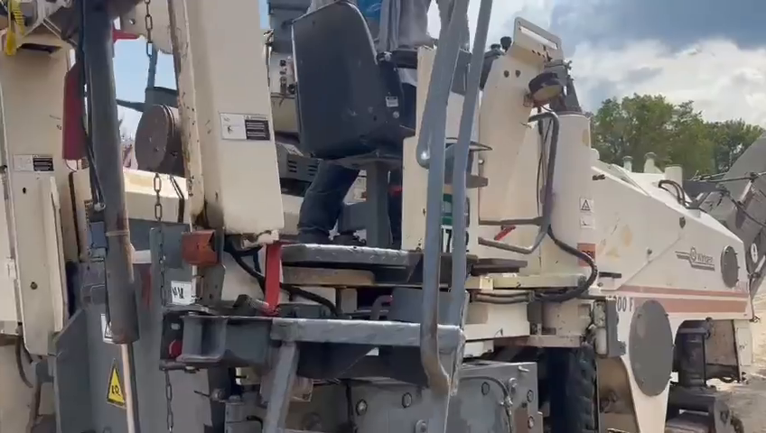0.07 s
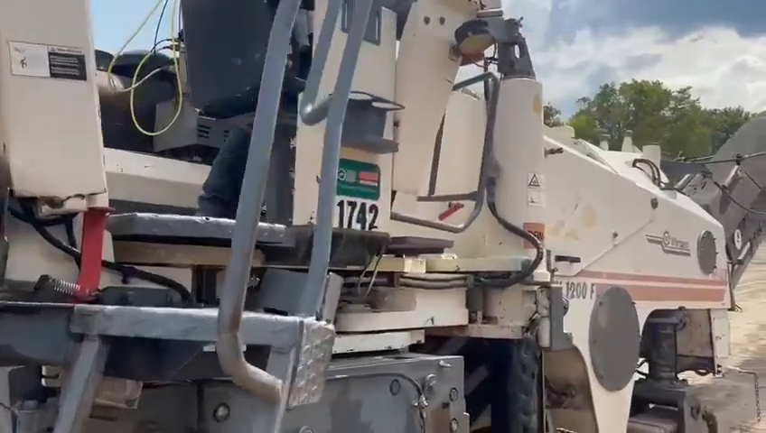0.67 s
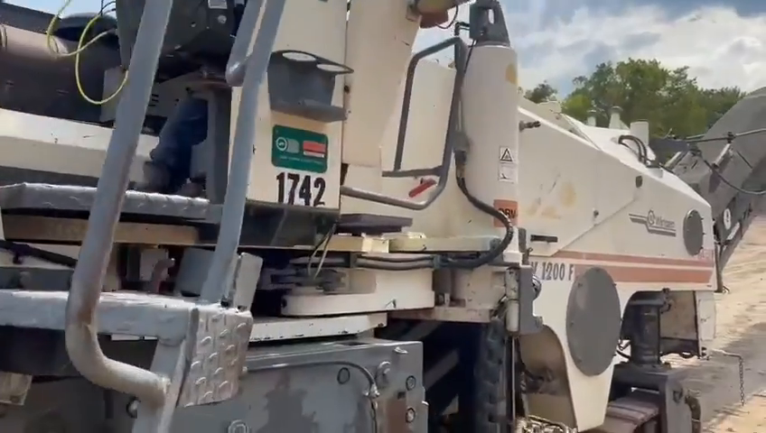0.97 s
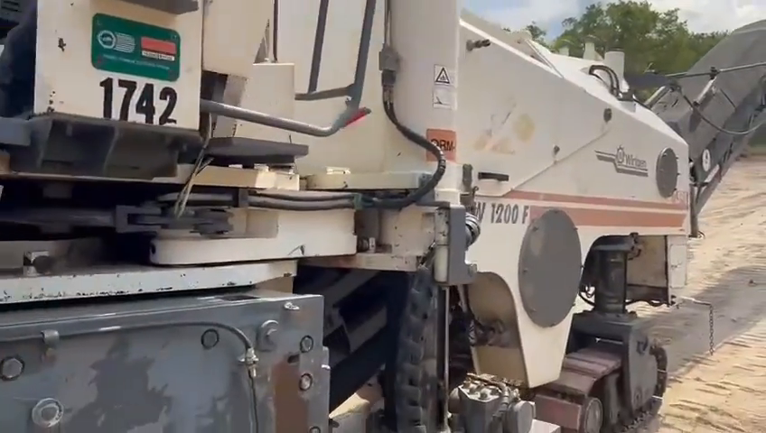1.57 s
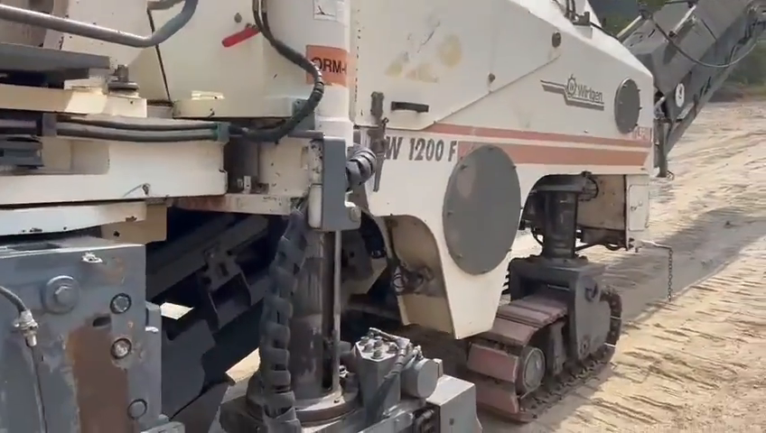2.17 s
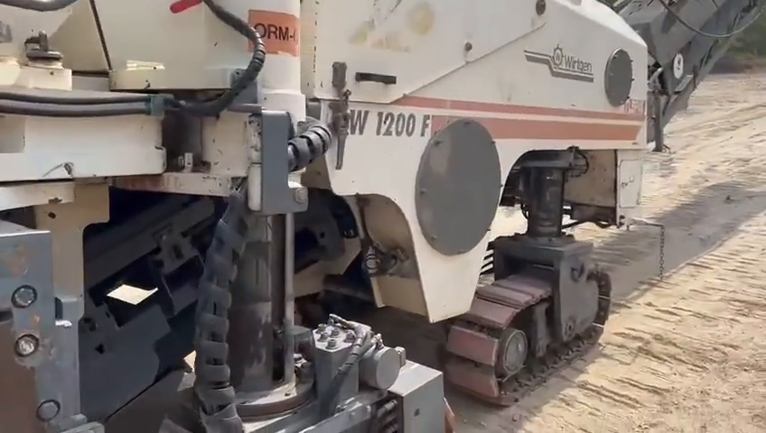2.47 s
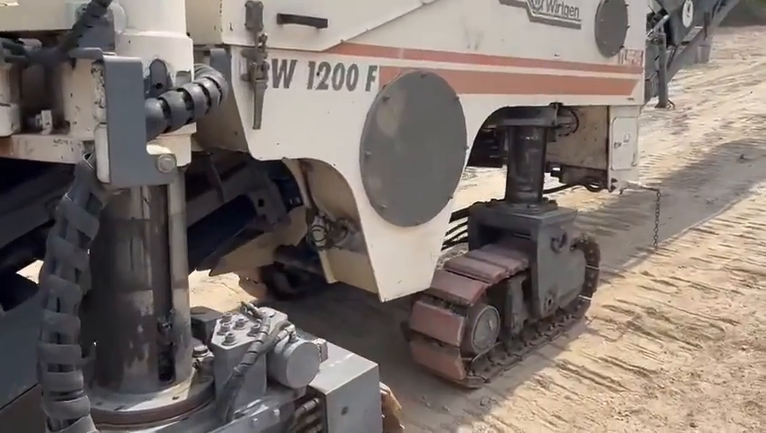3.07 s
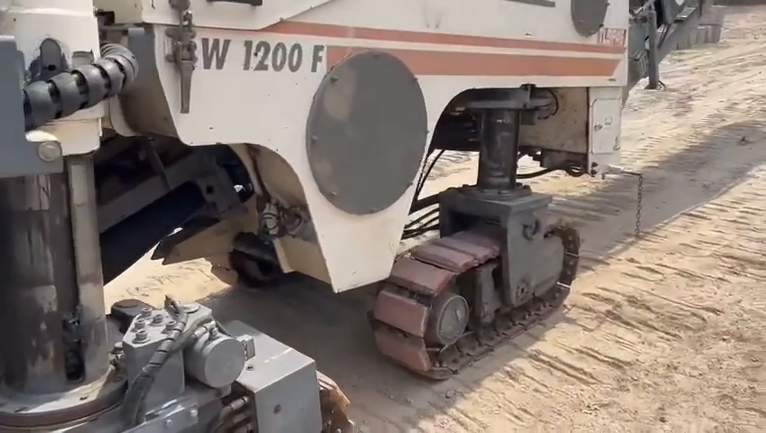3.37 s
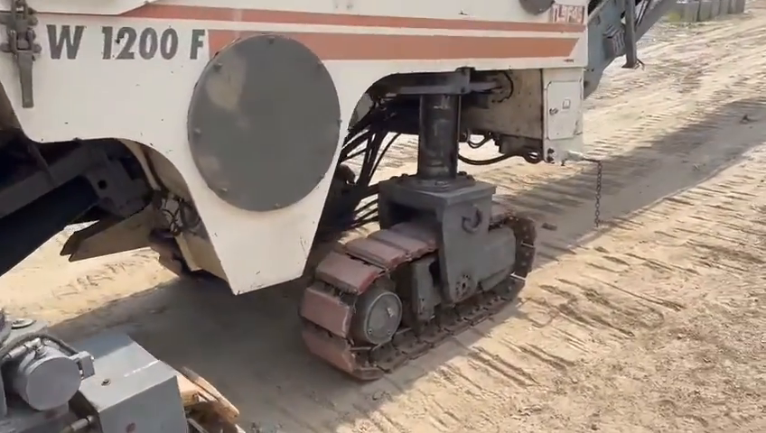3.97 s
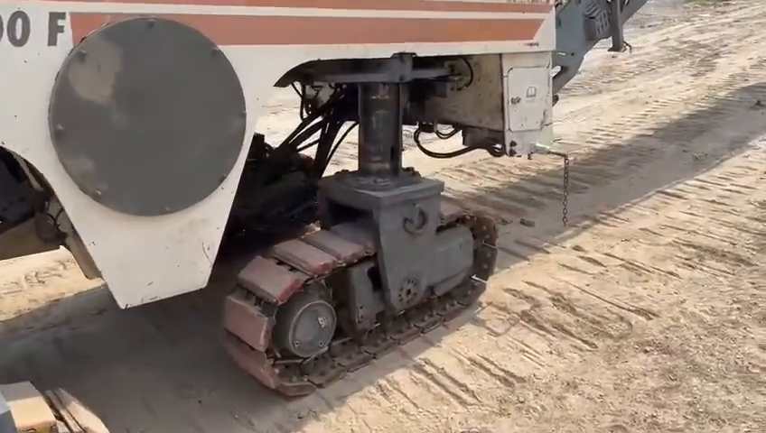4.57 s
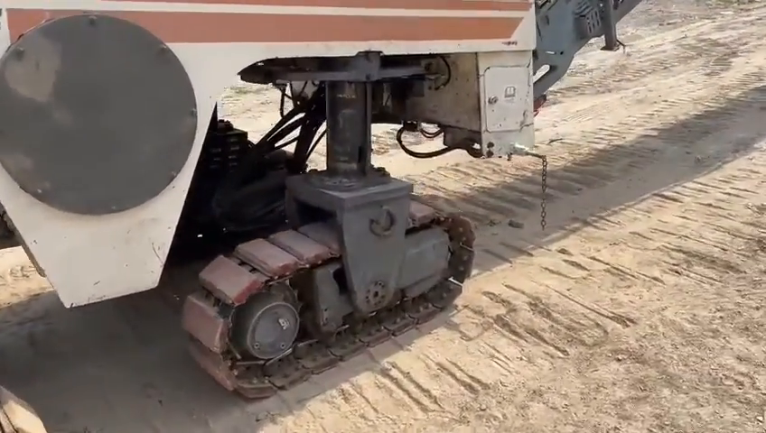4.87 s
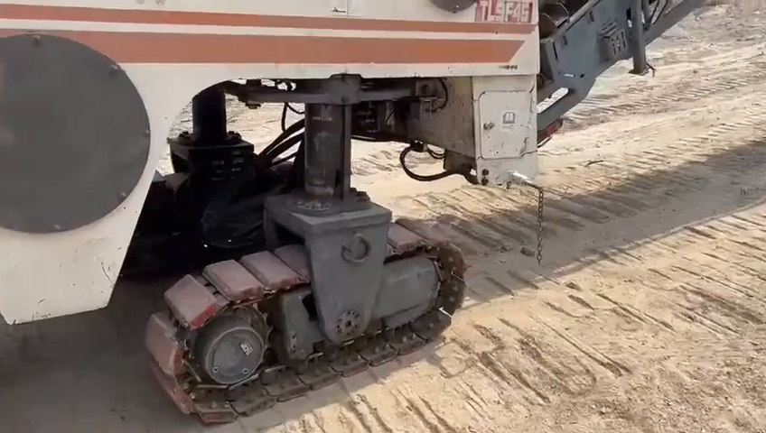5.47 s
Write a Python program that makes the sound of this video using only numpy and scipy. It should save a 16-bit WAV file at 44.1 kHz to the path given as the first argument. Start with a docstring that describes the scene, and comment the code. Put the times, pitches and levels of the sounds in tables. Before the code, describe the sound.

The large diesel engine of a parked road milling machine runs at a constant high speed throughout, heard close up outdoors as the microphone moves along its side. A deep exhaust drone and rumble sit under dense mechanical rattle, faintly ringing metal covers, rushing cooling air and a thin hiss. A mid-pitched fan hum pulses quickly, clearest from about 0.5 to 1.7 seconds. The combustion clatter grows brighter between 0.5 and 3 seconds. A thin pump whine swells and fades, standing out near 2 seconds and again around 3.5 to 4 seconds. The drone is fullest at about 3 seconds, then recedes from 4 seconds on, while the rumble and clatter carry on. From about 4 to 5 seconds the fan hum flutters in brief, rough surges. The sound drifts slightly to the left and is still running at the end, near 5.6 seconds.

```python
"""Walking past a parked road milling machine

Its six-cylinder diesel runs at a governed 2450 rpm on open sand. The exhaust drones at the firing rate,
combustion rattles the block and rings the covers, the fan hums and rushes, and a pump drive whines.
The microphone walks along the side, through the tones' standing waves and out of the exhaust's reach."""
import sys
import numpy as np
from scipy import signal
from scipy.fft import rfft, irfft, next_fast_len
from scipy.io import wavfile
from scipy.ndimage import uniform_filter1d, map_coordinates

SR = 44100
rng = np.random.default_rng(int(sys.argv[2]) if len(sys.argv) > 2 else 0)


def store_pcm(level_fs):
    """Save levels as 16-bit WAV."""
    pcm = np.round(np.clip(level_fs, -1, 1) * 32767).astype(np.int16)
    wavfile.write(sys.argv[1], SR, np.atleast_2d(pcm).T)


N = 252252
TIME = np.arange(N) / SR
CYCLE_HZ = 20.41  # one engine cycle: two crank turns, six firings


def amp(db):
    """Decibels to gain."""
    return 10 ** (np.asarray(db) / 20)


def unit(x):
    """Scale to rms 1."""
    return x / np.sqrt(np.mean(x ** 2) + 1e-20)


def along(points, hz):
    """Read (frequency, value) points on a log axis."""
    freqs, values = np.transpose(points)
    return np.interp(np.log(hz + 1), np.log(freqs), values)


def curves(rows):
    """One automation curve for each column after the time."""
    times, *columns = np.transpose(rows)
    return [np.interp(TIME, times, column) for column in columns]


def ramp(start_s, length_s):
    """An even rise from 0 to 1."""
    return np.clip((TIME - start_s) / length_s, 0, 1)


def bell(at_s, half_s):
    """A smooth swell to 1 and back."""
    return np.exp(-((TIME - at_s) / half_s) ** 2)


def standing(loudest_s, spacing_s, swing_db):
    """A tone's rise and fall in dB as the microphone walks through its standing wave."""
    return swing_db * np.cos(2 * np.pi * (TIME - loudest_s) / spacing_s)


def drift(rate):
    """A smooth random curve on a coarse time grid, rate knots a second."""
    count = N // 64
    return map_coordinates(rng.standard_normal(count), [np.linspace(0, N, count) * rate / SR], mode="wrap")


def stretched(coarse):
    """A coarse curve at one value per sample."""
    return np.interp(np.arange(N), np.linspace(0, N, len(coarse)), coarse)


def wobble(rate):
    """Smooth random modulation, rate knots a second."""
    return stretched(drift(rate))


def noise():
    """Two unrelated white noises."""
    return rng.standard_normal((2, N))


def filtered(x, response):
    """Equalise x with a gain that is a function of frequency."""
    size = next_fast_len(N + SR // 4)
    return irfft(rfft(x, size) * response(np.fft.rfftfreq(size, 1 / SR)), size)[..., :N]


# Stereo balance: (frequency [Hz], left minus right [dB])
STEREO_BALANCE = [(60, 1), (200, 2), (500, 2.5), (2000, 2.5), (4000, 2.5), (5400, 8), (7000, -0.5),
                  (9000, 4.5)]
# Stereo phase; the top hiss is in nearly opposite phase: (frequency [Hz], left lead [rad])
STEREO_PHASE = [(60, .06), (200, .28), (500, .5), (1200, 1.05), (2000, .45), (3000, 1.0), (3800, .3),
                (4800, .55), (6500, 0), (8100, -.1), (9100, -3), (11500, -2.8)]
def stereo_gains(hz):
    """Complex gain of the left and right channel: the image leans left."""
    half = amp(along(STEREO_BALANCE, hz) / 2) * np.exp(.5j * along(STEREO_PHASE, hz))
    return np.array([half, 1 / half])


# Stereo likeness; the top hiss is nearly identical left and right: (frequency [Hz], likeness [0-1])
STEREO_LIKENESS = [(100, .99), (250, .92), (500, .76), (1000, .45), (2000, .5), (4000, .46), (7800, .5),
                   (9200, .98)]
def spread(pair, spectrum):
    """Two unrelated signals become one coloured stereo sound of rms 1."""
    def mid_side_gains(hz):
        width = np.arccos(np.clip(along(STEREO_LIKENESS, hz), 0, 1)) / 2
        return amp(along(spectrum, hz)) * np.array([np.cos(width), np.sin(width)])
    mid, side = filtered(pair, mid_side_gains)
    return unit(filtered(np.array([mid + side, mid - side]), stereo_gains))


def tone(clock, hz, scatter, rate):
    """A stereo tone of rms 1: a direct wave plus shifting reflections, scatter times as strong."""
    common, left, right = [(drift(rate) + 1j * drift(rate)) / np.sqrt(2) for _ in range(3)]
    alike = np.clip(along(STEREO_LIKENESS, hz), 0, 1)
    reflected = np.sqrt(alike) * common + np.sqrt(1 - alike) * np.array([left, right])
    gains = stereo_gains(hz)[:, None] * (1 + scatter * reflected)
    wave = np.exp(2j * np.pi * hz * clock)
    return unit(np.array([np.real(stretched(gain) * wave) for gain in gains]))


# Sub-bass bed: (frequency [Hz], relative level [dB])
SUB_SPECTRUM = [(10, -16.5), (25, -13), (40, -9), (60, 3), (80, -6), (130, -31), (300, -80)]
def sub_bass():
    """The longest waves bend round the machine and stay level."""
    return amp(-47.5) * spread(noise(), SUB_SPECTRUM)


# Airy top end: (frequency [Hz], relative level [dB])
HISS_SPECTRUM = [(1500, -29), (3000, 0), (4300, -0.5), (5200, -1), (6300, -4), (8000, -3.5), (10000, -22.5),
                 (11600, -4)]
def hiss():
    """A thin hiss whose level flickers slightly."""
    return amp(-40 + 0.55 * wobble(9)) * spread(noise(), HISS_SPECTRUM)


# Cooling airflow: (frequency [Hz], relative level [dB])
AIR_SPECTRUM = [(150, -20), (270, -0.5), (340, -2.5), (420, -5.5), (475, -0.5), (530, -6.5), (620, -10),
                (1000, -16), (2000, -78)]
def cooling_air():
    """The fan drives a nearly steady rush of air."""
    return amp(-29.5 + 0.19 * wobble(5)) * spread(noise(), AIR_SPECTRUM)


# Gear mesh tone: (time [s], level [dB])
MESH_LEVEL = [(0.3, -44), (0.75, -41), (1.0, -47), (1.35, -37), (1.8, -54), (3.6, -49), (4.3, -60)]
# Timing gear tones: (cycle multiple, level [dB], loudest at [s], spacing [s], swing [dB])
TIMING_TONES = [(40.84, -48.5, 0.4, 3.2, 1), (53.64, -47, 2.4, 7, 2.5), (149, -64, 3.5, 5, 2.5)]
def timing_gears(clock):
    """Meshing teeth sing faintly, fading in and out along the walk."""
    mesh_multiple = 72  # a gear tone at 72 times the engine cycle
    mesh = amp(curves(MESH_LEVEL)[0]) * tone(clock, mesh_multiple * CYCLE_HZ, scatter=0.32, rate=5)
    return mesh + sum(amp(db + standing(*wave)) * tone(clock, k * CYCLE_HZ, scatter=0.95, rate=4.4)
                      for k, db, *wave in TIMING_TONES)


# Pump shaft: (time [s], speed [turns/s])
SHAFT_SPEED = [(2.2, 106.87), (3.0, 107.1), (3.7, 107.25), (4.4, 106.8), (5.5, 107.0)]
# Pump's tooth tone: (time [s], level [dB])
WHINE_LEVEL = [(0.1, -47), (0.4, -52), (0.6, -44), (1.4, -50), (1.6, -40.5), (2.15, -34), (2.4, -43),
               (2.95, -52), (3.15, -42), (3.3, -46), (3.45, -37), (4.0, -38.5), (4.5, -58), (4.9, -58),
               (5.2, -45), (5.45, -40), (5.7, -44)]
# Shaft multiples either side of the tooth tone: (time [s], lower level [dB], upper level [dB])
SIDEBAND_LEVELS = [(0.3, -39.5, -50), (0.75, -52, -44), (1.4, -46, -53), (2.0, -39.5, -47),
                   (2.5, -47.5, -57), (3.1, -42, -40.5), (3.35, -51, -42), (3.9, -61, -35.5),
                   (4.45, -57, -48), (4.95, -56, -48), (5.2, -54, -40), (5.55, -59, -53)]
# Faint high pump tones: (shaft multiple, level [dB], loudest at [s], spacing [s], swing [dB])
PUMP_TONES = [(23.97, -52.5, 4.8, 7.4, 4.5), (25.05, -56.5, 2.6, 5.5, 2.5), (26.6, -59.5, 6.7, 1.6, 5.5),
              (26.7, -54, 2, 4.3, 2.5), (28.2, -57, 3.7, 3, 6.5)]
def pump_drive():
    """The drive's teeth whine, swelling and fading among the steel panels."""
    shaft_hz, teeth = 107.05, 13
    clock = np.cumsum(curves(SHAFT_SPEED)[0]) / (shaft_hz * SR)
    whine = amp(curves(WHINE_LEVEL)[0]) * tone(clock, teeth * shaft_hz, scatter=0.24, rate=12)
    sidebands = sum(amp(db) * tone(clock, k * shaft_hz, scatter=0.65, rate=17)
                    for k, db in zip((teeth - 1, teeth + 1), curves(SIDEBAND_LEVELS)))
    highs = sum(amp(db + standing(*wave)) * tone(clock, k * shaft_hz, scatter=0.91, rate=7)
                for k, db, *wave in PUMP_TONES)
    return whine + sidebands + highs


# Sheet-metal resonances: (frequency [Hz], relative level [dB], passed at [s])
COVER_MODES = [(602, -2.5, 1.5), (736, 2, 1.4), (826, -3, 3.9), (983, -2, 1.8), (1050, -4.5, 1.8),
               (1613, -5, 1.2), (1930, -5.5, 4.2), (2132, -3, 4.6), (2370, -5, 4.5), (2680, -9.5, 5.2),
               (2920, -9.5, 3.7), (3430, -12.5, 4), (4060, -12.5, 4.8), (4660, -11.5, 1.9)]
def covers(clock):
    """Every firing jolts the covers with a random force; each rings loudest as the microphone passes."""
    width_hz, passing_db = 23, 7
    jolts = np.flatnonzero(np.diff(np.floor(6 * CYCLE_HZ * clock)) > 0)
    ring = 0
    for hz, db, passed_s in COVER_MODES:
        force = np.zeros((2, N))
        force[:, jolts] = rng.standard_normal((N // 64, 2))[:len(jolts)].T
        mode = signal.lfilter(*signal.iirpeak(hz, hz / width_hz, SR), force)
        ring = ring + amp(db) * unit(mode * amp(passing_db * bell(passed_s, half_s=.7)))
    return amp(-38) * spread(ring, spectrum=[(1000, 0)])  # flat EQ


# Fan's blade tone: (time [s], level [dB])
BLADE_LEVEL = [(0.25, -40), (0.45, -29.3), (1.0, -29), (1.42, -30.5), (1.55, -39), (2.0, -38), (2.5, -33),
               (3.1, -44), (3.75, -33), (4.4, -34), (4.9, -37), (5.6, -37)]
# Brief surges of the blade tone: (time [s], level [dB])
BLADE_SURGES = [(1.65, -27), (1.73, -28), (3.84, -29), (4.0, -27), (4.1, -26), (4.135, -24.5),
                (4.244, -22.5), (4.345, -23.5), (4.378, -24), (4.408, -21), (4.49, -26), (4.593, -23.5),
                (4.64, -27), (4.682, -24), (4.82, -29), (4.93, -30), (5.03, -28)]
# Rough air in a surge: (frequency [Hz], relative level [dB])
SURGE_SPECTRUM = [(120, -100), (280, -30), (370, -7), (420, -8), (475, 0), (520, -9), (620, -35),
                  (1200, -120)]
def fan(clock):
    """The fan's hum beats about nine times a second and swells in brief, rough surges."""
    blade_hz, surge_hz = 478.6, 474.5  # the pitch sags in a surge
    beat_hz, beat_db = 9.3, 2.2
    beat = np.sin(2 * np.pi * (beat_hz * clock + .2 * wobble(4)))
    blade_db = curves(BLADE_LEVEL)[0] + beat_db * beat
    blade = amp(blade_db) * tone(clock, blade_hz, scatter=0.25, rate=16)
    surge = tone(clock, surge_hz, scatter=0.071, rate=14) + amp(-4) * spread(noise(), SURGE_SPECTRUM)
    surge_envelope = sum(amp(db) * bell(at_s, half_s=.026) for at_s, db in BLADE_SURGES)
    octave_db = -45.5 + standing(loudest_s=2.86, spacing_s=6.3, swing_db=3)
    octave = amp(octave_db) * tone(clock, 2 * blade_hz, scatter=1.0, rate=7)
    return blade + surge_envelope * surge + octave


def knocks(clock, depth):
    """Envelope of six combustion blows a cycle: each cylinder has its own strength, each blow varies."""
    firing = 6 * CYCLE_HZ * clock
    blow = np.floor(firing).astype(int)
    cylinder_db = rng.normal(0, 1.4, 6)[blow % 6]
    blow_db = rng.normal(0, 0.84, blow.max() + 2)[blow]
    return unit(1 + depth * amp(cylinder_db + blow_db) * np.exp(-(firing % 1) / 0.58))


def clumped(x, depth_db=1.56):
    """Add grain: brief patches of random gain, a few hundred Hz wide."""
    spectra = signal.stft(x, SR, nperseg=512)[2]
    patches = uniform_filter1d(rng.standard_normal(spectra.shape[1:]), size=4, axis=0)
    patches = uniform_filter1d(patches, size=7, axis=1)
    return signal.istft(spectra * amp(depth_db * unit(patches)), SR, nperseg=512)[1][:, :N]


def panels(x, patchy_db):
    """Reflections among the steel panels colour the sound with narrow, slowly shifting peaks."""
    hz, t, spectra = signal.stft(x, SR, nperseg=1024)
    patches = uniform_filter1d(rng.standard_normal(spectra.shape), size=3, axis=1)
    patches = uniform_filter1d(patches, size=70, axis=2)
    # one glancing reflection lifts a band that sinks as its path grows
    centre_hz = 7360 * 2 ** (-.35 * t)
    swell = np.exp(-((t - 2.6) / 3.3) ** 2)
    band = np.exp(-(np.log((hz[:, None] + 1) / centre_hz) / 0.1) ** 2)
    lift_db = np.array([.6, 2.2])[:, None, None]  # left, right
    colour_db = patchy_db * unit(patches) + lift_db * swell * band
    return signal.istft(spectra * amp(colour_db), SR, nperseg=1024)[1][:, :N]


# Bright combustion clatter: (frequency [Hz], relative level [dB])
CLATTER_SPECTRUM = [(600, -31), (1200, -10), (1800, 2), (2200, 2), (2700, -2), (3300, -6), (4200, -10.5),
                    (6000, -44.5), (9000, -63)]
# Metallic rattle accents: (time [s], lift [dB])
RATTLE_ACCENTS = [(0.78, 3), (4.12, 3), (4.37, 1.5), (4.73, 1), (5.23, 2.5)]
def clatter(clock):
    """Combustion clatter grows as the gap under the body opens to the microphone."""
    gap_db = 4 * ramp(start_s=0.56, length_s=2.36)
    rattle_db = sum(db * bell(at_s, half_s=.03) for at_s, db in RATTLE_ACCENTS)
    level_db = -39.5 + gap_db + rattle_db + 0.41 * wobble(21.04)
    return amp(level_db) * spread(clumped(noise()) * knocks(clock, depth=0.13), CLATTER_SPECTRUM)


# Midrange body of the engine block: (frequency [Hz], relative level [dB])
BLOCK_SPECTRUM = [(200, -37), (330, 3.5), (480, 4.5), (620, 1), (830, 1.7), (1000, -1), (1250, -3),
                  (1500, -5), (1800, -13.5), (3000, -32.5), (6000, -69)]
def block(clock):
    """Valves and injectors repeat one rattle every cycle; its pattern changes slowly along the walk."""
    size = round(SR / CYCLE_HZ)
    place = (CYCLE_HZ * clock % 1) * size  # position within the engine cycle
    patterns = rng.standard_normal((6, 2, size))
    weights = np.array([wobble(1.65) for _ in patterns])
    weights /= np.linalg.norm(weights, axis=0)
    rattle = sum(weight * np.array([np.interp(place, np.arange(size), side) for side in pattern])
                 for weight, pattern in zip(weights, patterns))
    loose = clumped(noise()) * knocks(clock, depth=0.25)  # new with every blow
    body = amp(-5.5) * spread(rattle, BLOCK_SPECTRUM) + amp(-3) * spread(loose, BLOCK_SPECTRUM)
    bay_db = 0.6 * bell(at_s=1.48, half_s=0.48)  # passing the open engine bay
    wall = ramp(start_s=3.91, length_s=0.45)  # the side wall comes between engine and microphone
    wall_db, shelf_db = -1 * wall, 2 - 2.5 * wall
    treble = filtered(body, lambda hz: 1 - 1 / (1 + (hz / 1000) ** 8))
    return amp(-27 + bay_db + wall_db) * (body + (amp(shelf_db) - 1) * treble)


# Low exhaust turbulence: (frequency [Hz], relative level [dB])
RUMBLE_SPECTRUM = [(40, -32), (65, -9), (85, -4.5), (110, 0.5), (150, 0.5), (195, 1), (250, -4.5),
                   (300, -15.5), (450, -28.5), (900, -71)]
def exhaust_rumble(clock):
    """Turbulent flow chugs once a cycle, as one cylinder puffs harder than the rest."""
    puff_at, puff_half_length = 0.28, 0.12  # shares of a cycle
    puff = np.exp(-((CYCLE_HZ * clock % 1 - puff_at) / puff_half_length) ** 2)
    chug = unit(1 + 0.78 * puff)
    return amp(-27.5 + 0.12 * TIME) * spread(noise() * chug, RUMBLE_SPECTRUM)


# The drone's swell and fade along the walk: (time [s], relative level [dB])
DRONE_FADE = [(0.1, -19.5), (0.5, -19), (1.9, -16.5), (2.6, -15), (3.3, -14.5), (3.8, -16.5), (4.4, -21),
              (5.0, -26.5), (5.62, -28)]
# Exhaust tones and their standing waves:
# (cycle multiple, relative level [dB], share of the fade [0-1], loudest at [s], spacing [s], swing [dB])
EXHAUST_TONES = [(2, -35, 0, -1, 5, -2), (3, -30, 0, -0.5, 7.7, 3.5), (5, -15.5, 0.17, 4.5, 9, 2),
                 (6, 0.5, 0.73, 0.5, 5.4, 1), (7, -14.5, 0.72, 1, 8.2, 3.5),
                 (8, -20.5, 0.43, 2.5, 4.3, 7.5), (9, -10, 0.022, 1.22, 7.3, 4.5),
                 (10, -7, 0.96, 2.8, 2.8, 0.6), (11, -25.5, 0.56, 3, 4.2, 9),
                 (12, -9.5, 0.55, 3.5, 3.2, 2.5), (13, -21.5, 0.1, 1.5, 4, 4.5), (14, -25, 0.04, 5.5, 5, 4),
                 (16, -26.5, 0.078, 1.6, 6, 7.5), (17, -26.5, 0.12, 0.7, 4.4, 6.5),
                 (18, -25.5, 0.12, 0.7, 4.2, 4.5), (20, -23.5, 1, 2.5, 3.7, 3.5)]
def exhaust_drone(clock):
    """The firing rate, six times the cycle, leads; unequal cylinders add the other multiples."""
    level_db, = curves(DRONE_FADE)
    fade_db = level_db - level_db.max()
    pipe_delay_s, silencer_lag_s = .0094, .0113  # the silencer holds higher multiples back longer
    drone = 0
    for k, db, share, *wave in EXHAUST_TONES:
        delayed = clock - pipe_delay_s - silencer_lag_s * k
        partial = tone(delayed, k * CYCLE_HZ, scatter=.04 if k == 6 else .16, rate=2.65)
        drone = drone - amp(db + share * fade_db + standing(*wave)) * partial
    return amp(-17) * drone


def scene():
    """Mix the machine around the engine's clock, which the governor holds nearly steady."""
    clock = TIME + 0.00017 * wobble(1.876) + .00002 * wobble(14)
    bed = sub_bass() + exhaust_rumble(clock) + cooling_air()
    engine = block(clock) + hiss()
    tones = exhaust_drone(clock) + fan(clock) + pump_drive() + timing_gears(clock) + covers(clock)
    machine = bed + tones + panels(engine + clatter(clock), patchy_db=2.0)
    pan_db = -2 + 0.42 * TIME  # the machine drifts leftward
    return machine * amp(np.array([pan_db, -pan_db]) / 2)


def record(dry):
    """A brick-wall low-pass trims the top end."""
    return filtered(dry, lambda hz: hz < 11800)


dry = scene()
out = record(dry)
store_pcm(out)
```